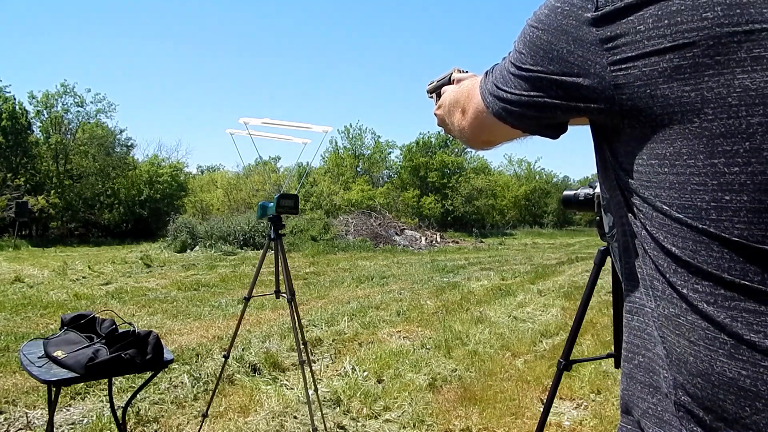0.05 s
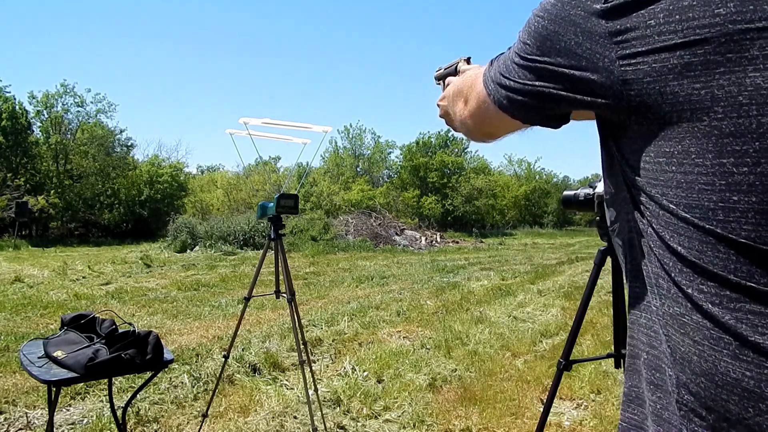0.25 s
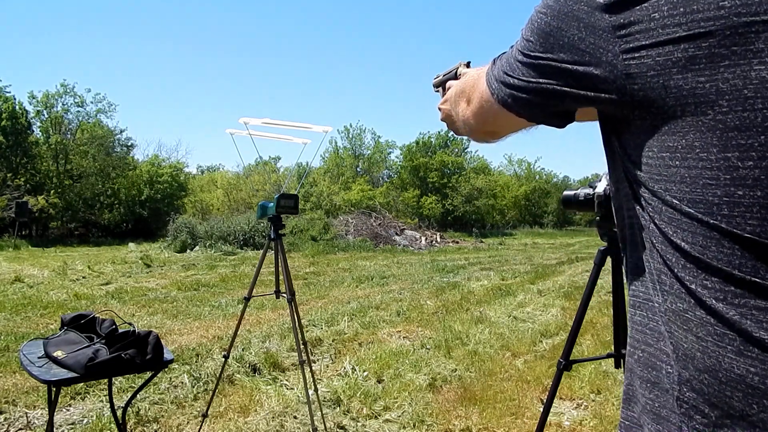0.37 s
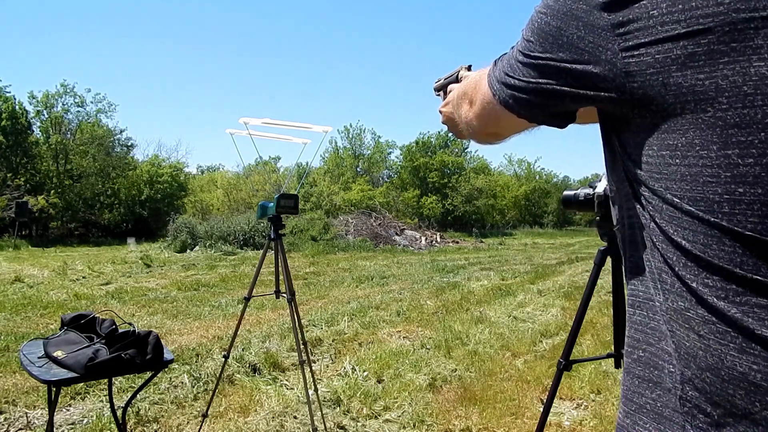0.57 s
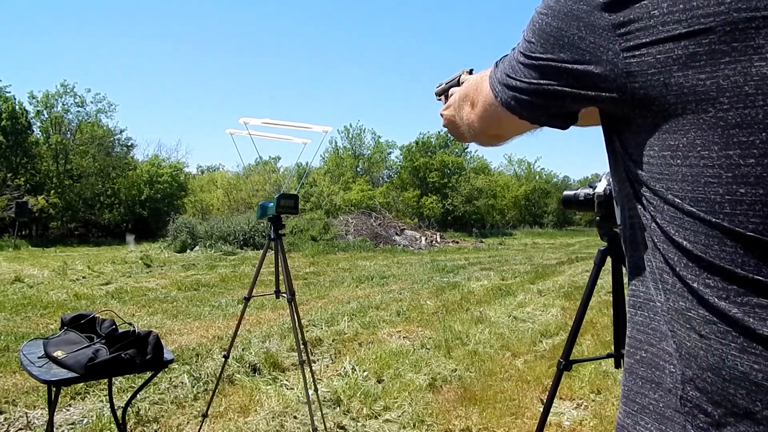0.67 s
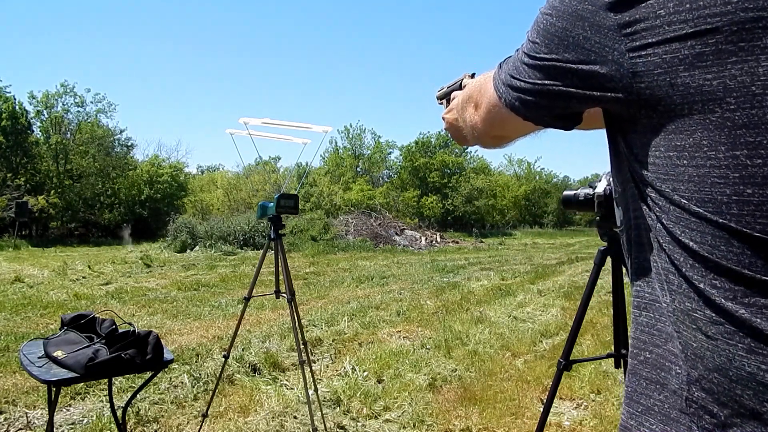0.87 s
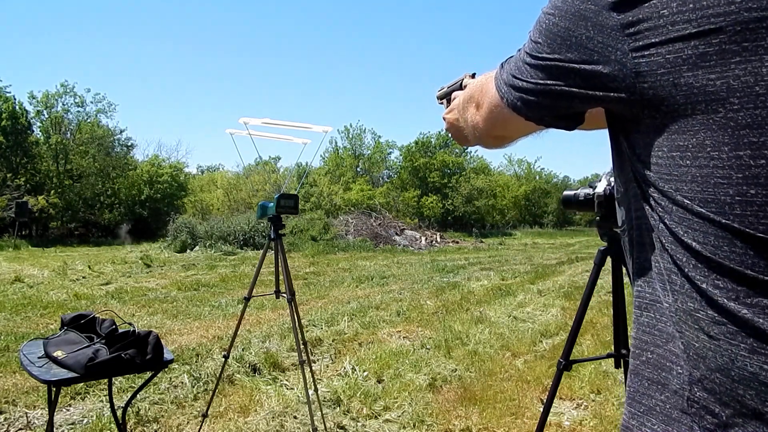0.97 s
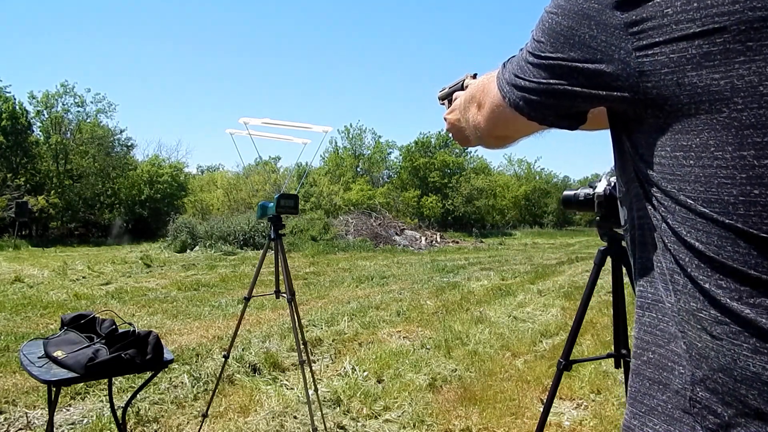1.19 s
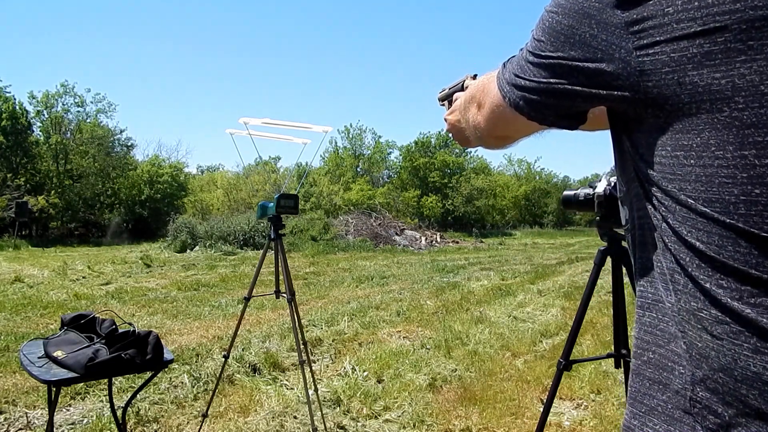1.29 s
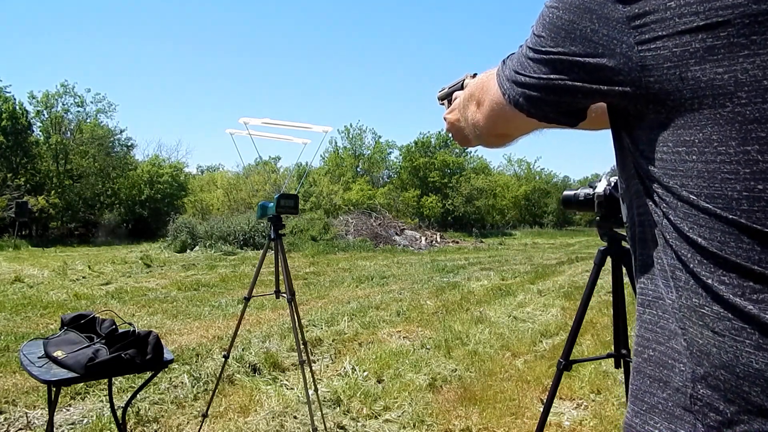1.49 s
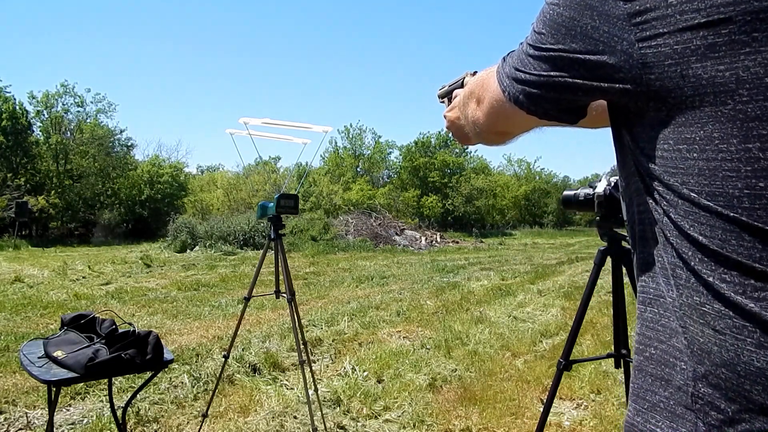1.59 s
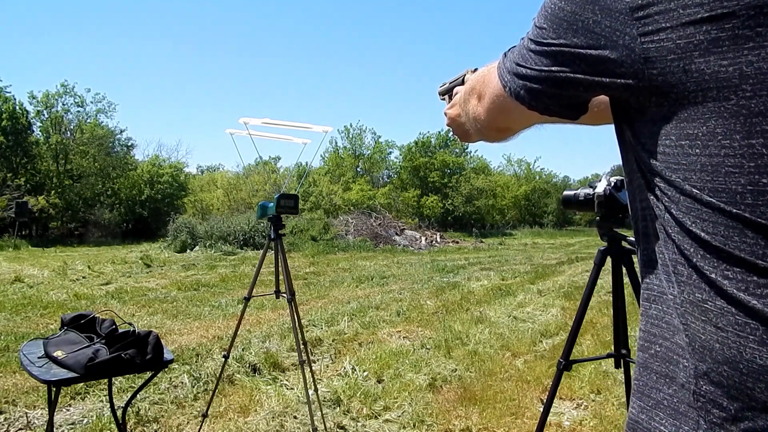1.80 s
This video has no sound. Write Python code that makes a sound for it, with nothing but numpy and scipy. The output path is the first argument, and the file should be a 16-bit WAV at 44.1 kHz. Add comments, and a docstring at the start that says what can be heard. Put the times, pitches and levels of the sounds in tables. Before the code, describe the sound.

A single close pistol blast in an open field, hard and slightly overloaded, scatters off the ground and trees in rapid echoes; the background ducks, then quiet air, light wind and a faint late tone creep back.

```python
"""On an open grass field ringed by trees, a revolver is fired a few metres from a small stereo microphone.
The blast is banded noise scattered back by the ground and gear close by, then by the tree line and far side.
Distinct echoes are short noise cracks, the sharp ones led by a pulse. Air, wind and a faint sliding tone
lie beneath; the recorder's gain control ducks hard on the blast, so they sink and creep back."""
import sys
import numpy as np
from scipy import signal
from scipy.io import wavfile
from scipy.ndimage import uniform_filter1d

SR = 44100
rng = np.random.default_rng(int(sys.argv[2]) if len(sys.argv) > 2 else 0)


def master(y):
    """Save y as 16-bit WAV."""
    cut = np.clip(np.atleast_2d(y).T, -1, 1)
    pcm = np.round(cut * 32767)  # scale
    wavfile.write(sys.argv[1], SR, pcm.astype(np.int16))


N = 81585
T = np.arange(N) / SR  # time in seconds


def amp(db):
    """Decibel law: a level in dB becomes an amplitude ratio."""
    return 10 ** (np.asarray(db) / 20)


def rms_one(x):
    """Normalisation: scale a signal to unit rms."""
    return x / np.sqrt(np.mean(x ** 2) + 1e-20)


def at_hz(points, hz):
    """Logarithmic frequency scale: interpolate a table's second column along it."""
    table_hz, values = np.array(points).T
    return np.interp(np.log(hz), np.log(table_hz), values)


def drift(rate_hz):
    """Low-passed chance: a slow random fluctuation of unit rms, from two equal poles at rate_hz."""
    step = 10  # samples between the slow values
    pole = np.exp(-2 * np.pi * step * rate_hz / SR)
    settle = 3000
    white = rng.standard_normal(N // step + settle + 2)
    slow = signal.lfilter([1], [1, -2 * pole, pole * pole], white)[settle:]
    return np.interp(np.arange(N) / step, np.arange(len(slow)), rms_one(slow))


RIGHT_LAG_S = .0001


def ports(common, own, alike):
    """Interaural coherence: mix by power a common sound, late on the right, with each port's own."""
    alike = np.clip(alike, 0, 1)
    pair = np.array([common, np.interp(T - RIGHT_LAG_S, T, common)])
    return np.sqrt(alike) * pair + np.sqrt(1 - alike) * own


def bands(spectrum, alike, shape):
    """Filter-bank synthesis: third-octave noise of total rms 1, each band then shaped in time by shape(hz)."""
    out, power = 0, 0
    edges_hz = 25 * 2 ** (np.arange(29) / 3)
    white = rng.standard_normal((2, 3, N))  # two sets, so neighbouring bands draw on different noise
    for k, (low_hz, high_hz) in enumerate(zip(edges_hz, edges_hz[1:])):
        band = signal.butter(3, [low_hz, high_hz], "band", fs=SR, output="sos")
        noise = signal.sosfilt(band, white[k % 2])
        hz = np.sqrt(low_hz * high_hz)
        gain = amp(at_hz(spectrum, hz))
        power += gain ** 2 * np.mean(noise ** 2)
        out = out + gain * shape(hz) * ports(noise[0], noise[1:], at_hz(alike, hz))
    return out / np.sqrt(power)


# Spectrum of the open air. Each row: frequency in Hz, relative spectral density in dB.
AIR = [(15, -41), (25, -10), (86, -4.5), (178, -10), (215, -5), (446, -13), (496, -17.5), (553, -9.5),
       (616, -11), (1180, -13.5), (15600, -35)]
# Share of the air's power common to both ports. Each row: frequency in Hz, share from 0 to 1.
AIR_ALIKE = [(60, 0.8), (240, 0.5), (950, 0.49), (3770, 0.03), (15000, 0.02)]
AIR_DB = -59.5


def air():
    """Diffuse ambient field: steady banded noise, each band's level fluctuating slightly by itself."""
    return amp(AIR_DB) * bands(AIR, AIR_ALIKE, lambda hz: amp(1.5 * drift(24)))


# Wind on the ports. Each row: time in seconds, level in dB before the lumps.
WIND = [(0, -67), (.12, -64), (.5, -69.5), (1.2, -70), (1.55, -70), (1.74, -69), (1.85, -66)]
WIND_TOP_HZ, WIND_LUMP_DB = 130, 4.5


def wind():
    """Turbulent pressure: low noise only partly shared by the ports, its level lumpy."""
    band = signal.butter(2, [30, WIND_TOP_HZ], "band", fs=SR, output="sos")
    low = signal.sosfilt(band, rng.standard_normal((3, N)))
    level_db = np.interp(T, *np.transpose(WIND)) + WIND_LUMP_DB * drift(5)
    return amp(level_db) * rms_one(ports(low[0], low[1:], 0.47))


# A faint far tone that slides down. Each row: time in seconds, centre frequency in Hz, peak level in dB.
TONE = [(0.948, 1140, -95.5), (1.15, 1115, -62), (1.349, 1080, -68), (1.45, 1058, -76.5),
        (1.549, 1045, -63.5), (1.85, 1000, -69.5)]


def sliding_tone():
    """Frequency modulation: a sine whose phase sums a falling, slightly wavering frequency."""
    s, centre_hz, db = np.transpose(TONE)
    hz = np.interp(T, s, centre_hz) + 2.6 * drift(33)
    return amp(np.interp(T, s, db)) * np.sin(2 * np.pi * np.cumsum(hz) / SR)


def background():
    """Superposition: the field's air, wind and far tone add."""
    return air() + wind() + sliding_tone()


def dying(start, rise, hold, t60):
    """Exponential decay: a linear rise and a hold, then a fall of 60 dB in t60 (all in seconds)."""
    fall_s = np.maximum(T - start - rise - hold, 0)
    return np.clip((T - start) / rise, 0, 1) * amp(-60 * fall_s / t60)


def crack(shape, low_hz, top_hz, front=0.):
    """Impulse excitation: noise under an envelope, led by a pulse at its crest, rings a band filter."""
    band = signal.butter(4, [low_hz, min(top_hz, .45 * SR)], "band", fs=SR, output="sos")
    noise = rng.standard_normal((3, N))
    pulse = front * (np.arange(N) == np.argmax(shape))
    burst = shape * ports(np.sign(noise[0]) - pulse, noise[1:], .85)
    level_makeup = np.sqrt(SR / 2 / (top_hz - low_hz))  # restores the power lost outside the band
    return signal.sosfilt(band, burst + 1e-18) * level_makeup


# Separate cracks, first the muzzle's own, then distinct echoes. Each row: start in seconds, level in dB,
# rise in seconds, 60 dB decay time in seconds, lower band edge in Hz, upper band edge in Hz,
# level in dB of the wash behind it relative to the crack.
ECHOES = [(0.2128, 8.5, 0.015, 0.042, 3700, 4440, -82), (0.214, -2, .006, 0.062, 4900, 15600, -39),
          (.2240, 11, 0.00046, 0.043, 3028, 11600, -10), (.2310, 15.5, 0.0022, 0.058, 910, 2500, -36),
          (.2380, 12, 0.0052, 0.096, 350, 980, -27), (.2400, 3, 0.0063, 0.13, 162.5, 219.4, -32),
          (.2520, 2.5, 0.0017, .02, 300, 2193, -44), (0.264, 5.5, 0.0014, 0.049, 302.5, 2585, -29.5),
          (0.282, 8.5, 0.00036, 0.018, 304.3, 2160, -44), (.299, 3, 0.00217, 0.039, 324, 1180, -15.5),
          (.306, -1.5, 0.00115, 0.029, 840, 2950, -5.5), (0.328, -7, 0.0054, 0.15, 1370, 2310, -25),
          (0.347, -2.5, 0.00253, 0.032, 600, 2230, -19.5), (0.375, -7, 0.00173, 0.026, 1187, 2220, -9.5),
          (0.436, -20, 0.0068, 0.29, 3310, 7500, -24), (.4425, -5.5, .001, 0.016, 475, 2630, -11),
          (0.472, -13.5, 0.00083, 0.038, 930, 2400, -11.5), (.525, -16, 0.00104, 0.031, 1280, 2390, -25),
          (.536, -33, 0.0013, 0.0096, 6035, 14520, -31), (.795, -46, 0.019, 0.21, 2784, 5600, -29),
          (.804, -28.5, 0.0058, 0.039, 1000, 2670, -10), (1.0126, -19, 0.00049, 0.011, 1026, 3050, -22),
          (1.0135, -20, 0.00045, 0.016, 1738, 2385, -26), (1.031, -37, 0.0015, .03, 1490, 2585, -16),
          (1.050, -43, 0.0018, 0.033, 1005, 1995, -28)]
ECHO_WASH_T60_S = 0.4
WASH_WIDER = 7.5  # the crack's lower edge over the wash's
FRONT = 4.2       # height of the pulse that leads a sharp crack, against its noise
SHARP_S = .0035   # cracks that rise faster than this get the pulse


def echoes():
    """Discrete reflection: each is a short crack in its own band, with a softer, broader wash behind it."""
    total = 0
    for s, db, rise, t60, low_hz, top_hz, wash_db in ECHOES:
        crack_shape = dying(s, max(rise, 1e-4), .001, t60)
        total = total + amp(db) * crack(crack_shape, low_hz, top_hz, FRONT * (rise < SHARP_S))
        wash_shape = dying(s, .004, 0, ECHO_WASH_T60_S)
        total = total + amp(db + wash_db) * crack(wash_shape, low_hz / WASH_WIDER, 1.15 * top_hz)
    return total


# Onset of the blast by band. Each row: frequency in Hz, delay after the shot in seconds.
ARRIVAL = [(60, .001), (160, 0.021), (280, .003), (1500, 0.00098), (2600, 0.0067), (6000, 0.012),
           (14000, 0.0051)]
# Share of the blast's power common to both ports. Each row: frequency in Hz, share from 0 to 1.
SHOT_ALIKE = [(60, 0.7), (600, 0.5), (2000, 0), (6000, 0), (14000, 1)]
SHOT_S, HOLD_S = .2145, .012


def scatter(spectrum, t60s, level_db, rough_db, rise_s):
    """Multiple scattering: many returns blend into noise, lumpy in all bands together, dying by band."""
    lumps = drift(140)

    def shape(hz):
        roughness = amp(rough_db * (0.5 * lumps + 0.26 * drift(53)))
        return roughness * dying(SHOT_S + at_hz(ARRIVAL, hz), rise_s, HOLD_S, at_hz(t60s, hz))

    return amp(level_db) * bands(spectrum, SHOT_ALIKE, shape)


# Near scatter from ground, shooter, table and tripods. Each row: frequency in Hz, relative density in dB.
NEAR = [(24, -55.5), (40, -26), (302, -5.5), (450, -2), (906, -14), (1380, -7.5), (1530, -16), (1820, -10),
        (2220, -16), (2650, -14.5), (5070, -17.5), (6670, -21), (11000, -20.5), (15600, -36.5)]
# Decay of the near scatter. Each row: frequency in Hz, 60 dB decay time in seconds.
NEAR_T60 = [(60, .1), (170, 0.2), (300, 0.13), (700, .13), (2000, 0.11), (6000, 0.24), (14000, 0.3)]
NEAR_DB, NEAR_ROUGH_DB, RISE_S = 15, 1, 0.0037


def near_scatter():
    """Early reflection: the blast returns from close by with a steep onset and a short decay."""
    return scatter(NEAR, NEAR_T60, NEAR_DB, NEAR_ROUGH_DB, RISE_S)


# Tree line wash. Each row: frequency in Hz, relative spectral density in dB.
TREES = [(40, -30.5), (170, -7), (270, -16), (378, -17.5), (485, -5), (820, -11.5), (1300, -11),
         (1800, -2.5), (2300, -9), (2900, -20.5), (4260, -16.5), (5200, -25.5), (6500, -22.5), (8350, -22),
         (11500, -28), (13500, -40), (15600, -55.5)]
# Decay of the tree line wash. Each row: frequency in Hz, 60 dB decay time in seconds.
TREES_T60 = [(60, 0.2), (170, 0.95), (350, 0.81), (800, 0.75), (1800, 0.94), (3500, 0.74), (7000, 0.63),
             (14000, 0.2)]
TREES_DB, TREES_ROUGH_DB = -4, 1.5


def tree_wash():
    """Late reverberation: the tree line's returns swell more gently and mostly last longer."""
    return scatter(TREES, TREES_T60, TREES_DB, TREES_ROUGH_DB, 0.018)


# Faint wash from the far side of the field. Each row: frequency in Hz, relative spectral density in dB.
FAR = [(35, -42), (60, -14), (170, -7.5), (296, -15.5), (494, 0.5), (570, -5.5), (1690, -1.5), (8000, -51),
       (10400, -81), (17600, -120)]
FAR_DB, FAR_T60_S = -27, 1.0


def far_wash():
    """Distant reverberation: a slow swell, then one decay time for every band."""
    return scatter(FAR, [(100, FAR_T60_S)], FAR_DB, 2.5, 0.36)


LEFT_DB = -1  # the shot and its echoes on the left, against the right


def scene():
    """Superposition: shot, echoes and field add at the microphone."""
    shot = near_scatter() + tree_wash() + far_wash()
    return (shot + echoes()) * amp([[LEFT_DB], [0]]) + background()


MIC_LOW_HZ, CUTOFF_HZ = 45.77, 15700
LIMIT_DB, RELEASE_DB_PER_S = -12.5, 15.5
SENSE_S, AHEAD_S = 0.0068, 0.001  # power averaging window, look-ahead
TOP = .7                          # ceiling of the soft overload


def record(dry):
    """Dynamic range limiting: look-ahead gain cut with steady release, soft overload, band limit."""
    dry = signal.sosfilt(signal.butter(2, MIC_LOW_HZ, "high", fs=SR, output="sos"), dry)
    power = uniform_filter1d(np.mean(dry ** 2, axis=0), max(int(SENSE_S * SR), 1))
    over_db = np.maximum(10 * np.log10(np.maximum(power, 1e-12)) - LIMIT_DB, 0)
    # a running maximum on a sloping line: instant cut, then release at a constant rate
    cut_db = np.maximum.accumulate(over_db + RELEASE_DB_PER_S * T) - RELEASE_DB_PER_S * T
    ducked = dry * amp(-np.interp(T + AHEAD_S, T, cut_db))
    overloaded = TOP * np.tanh(ducked / TOP)
    return signal.sosfilt(signal.ellip(12, .5, 70, CUTOFF_HZ, fs=SR, output="sos"), overloaded)


dry = scene()
out = record(dry)
master(out)
```